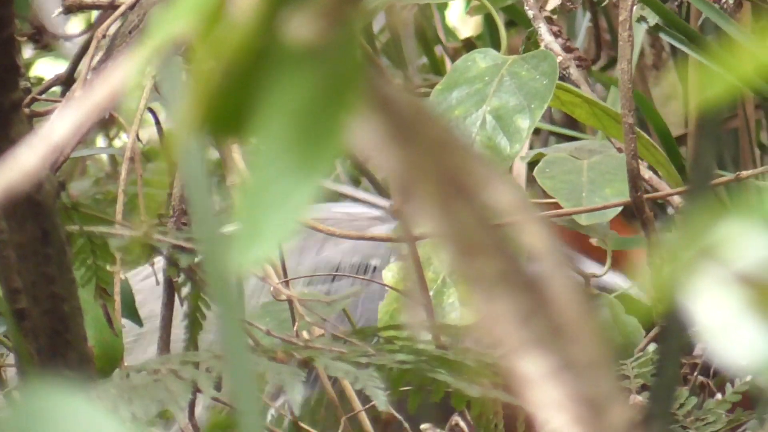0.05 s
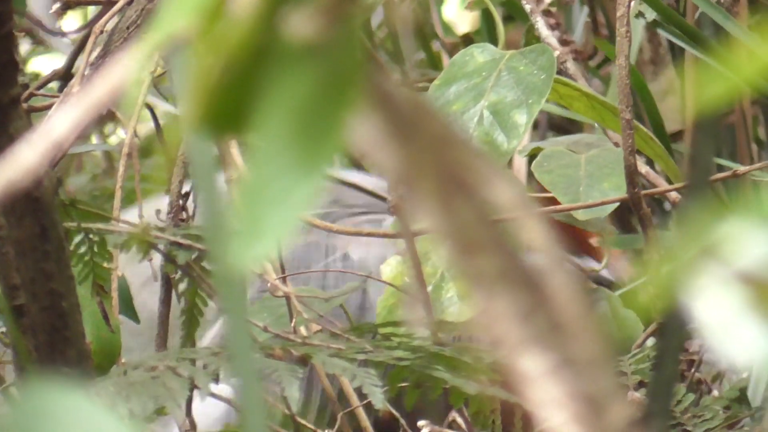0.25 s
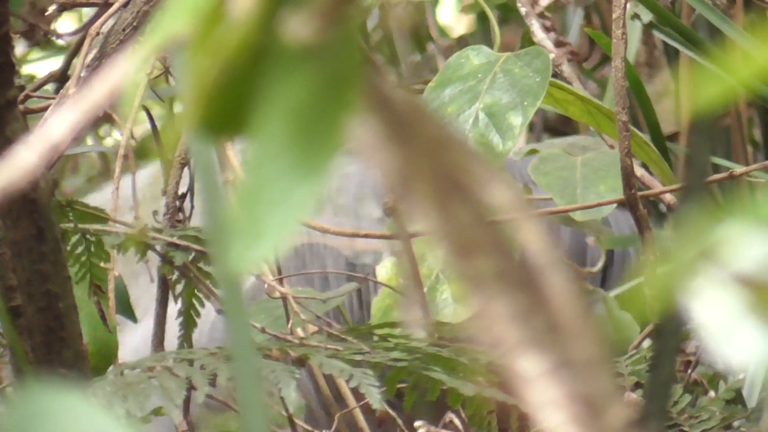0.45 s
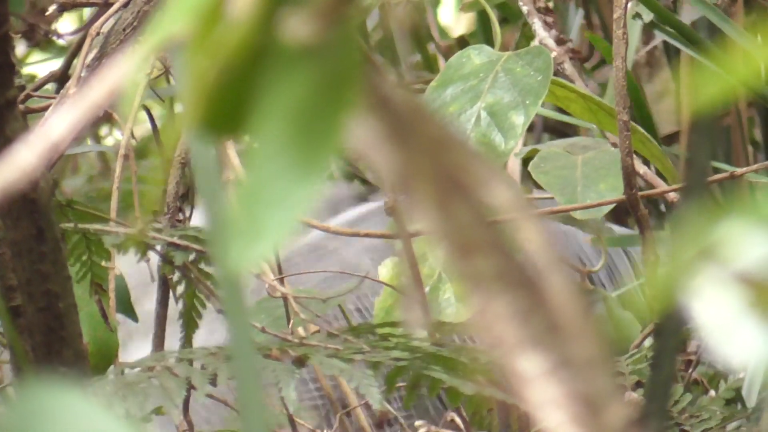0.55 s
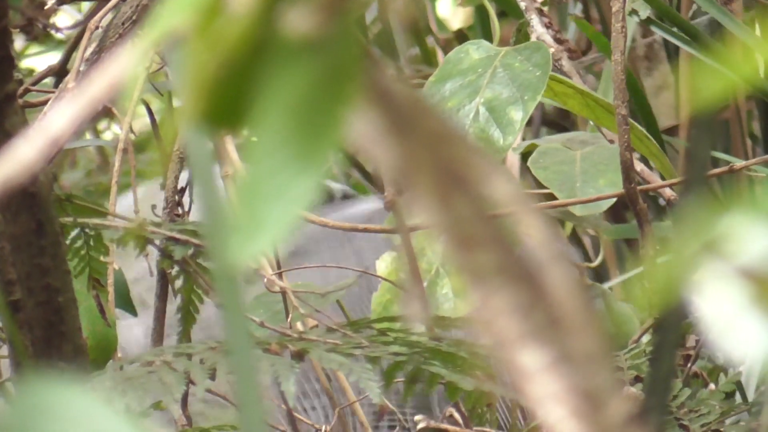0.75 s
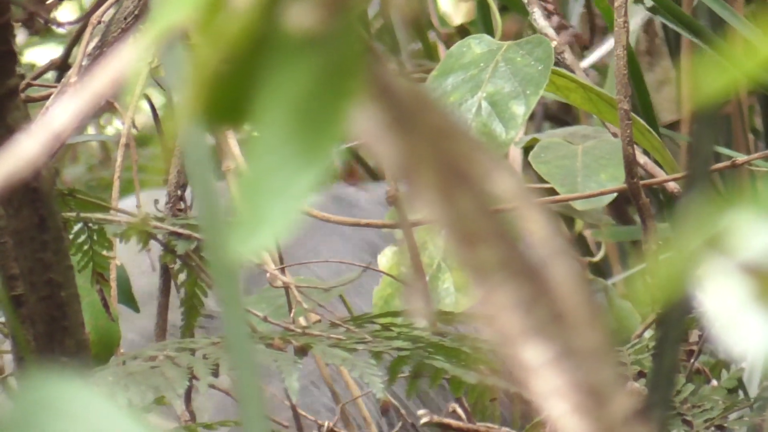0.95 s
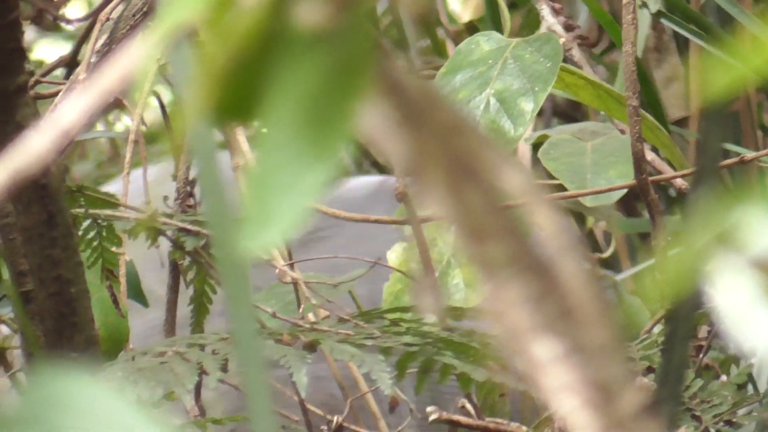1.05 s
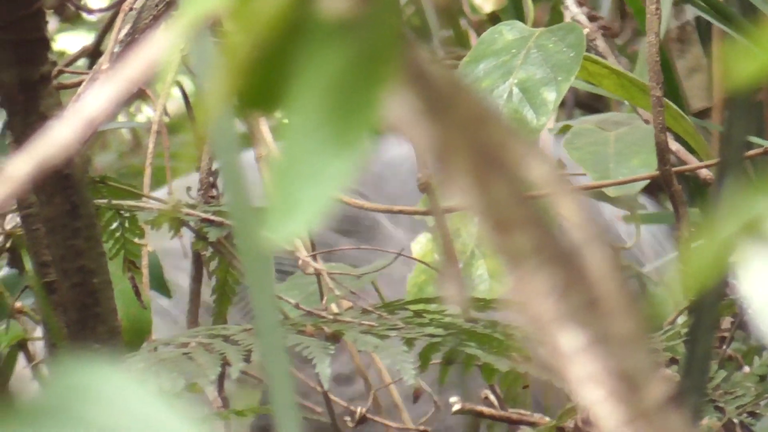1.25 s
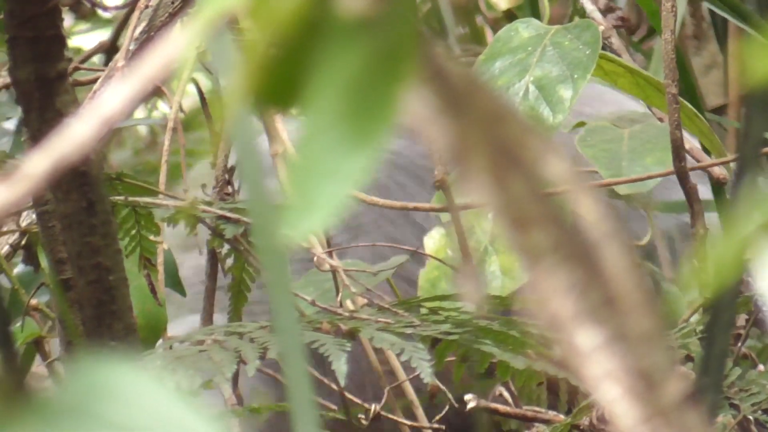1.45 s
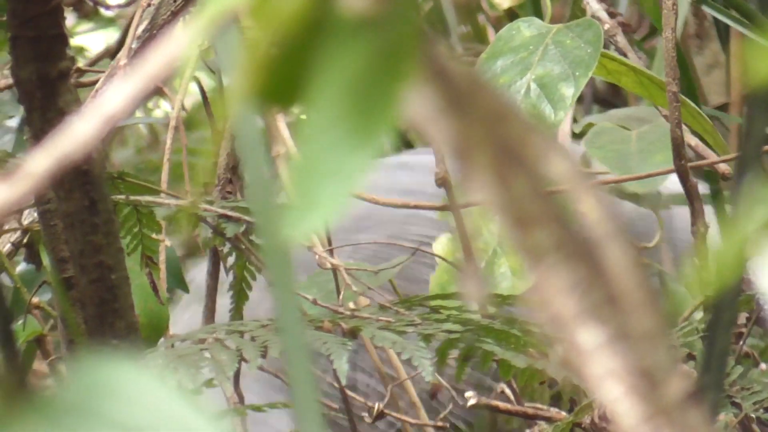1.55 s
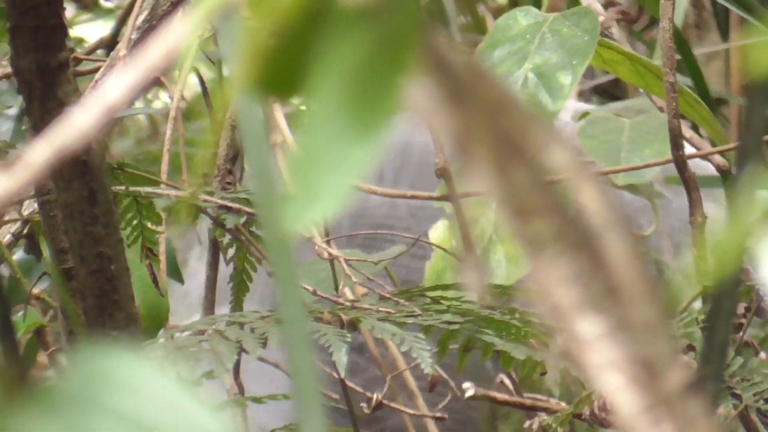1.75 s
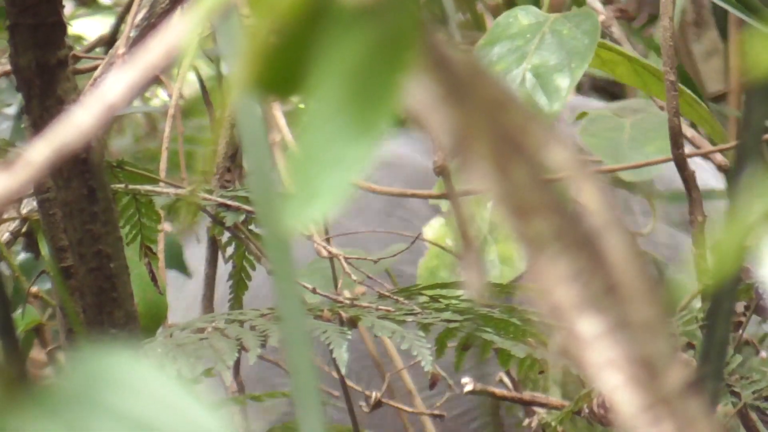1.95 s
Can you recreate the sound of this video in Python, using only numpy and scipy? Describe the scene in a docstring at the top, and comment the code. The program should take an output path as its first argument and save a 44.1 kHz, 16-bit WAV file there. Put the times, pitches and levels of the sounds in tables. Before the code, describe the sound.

A lyrebird in forest undergrowth gives a short rasp, a rising whistle, then a loud falling whip that breaks into a dry rattle and a harsh squeak. Faint distant birds and twig ticks follow over a quiet hiss.

```python
"""A lyrebird sings from the undergrowth over a quiet forest hiss, which swells softly at the start. Its
syrinx snaps out a short rasp, then whistles a two-voiced note that rises and flips up high. A loud
falling whip breaks into a dry rattle, and a harsh arched squeak trails off in a soft growl. Far birds
answer, twigs tick and the hiss swells twice more. Near stems and farther trees scatter the song."""
import sys
import numpy as np
from scipy import signal
from scipy.fft import rfft, irfft
from scipy.io import wavfile
from scipy.ndimage import uniform_filter1d

SR = 44100
rng = np.random.default_rng(int(sys.argv[2]) if len(sys.argv) > 2 else 0)


def file_out(sig):
    """Save sig as 16-bit WAV at sys.argv[1]."""
    # one column per channel
    cols = np.atleast_2d(sig).T
    # limit, then scale
    lim = np.clip(cols, -1, 1)
    pcm = np.round(lim * 32767).astype(np.int16)
    wavfile.write(sys.argv[1], SR, pcm)


N = 88200

# tone of the forest bed, the hiss swells and the twigs (frequency [Hz], relative level [dB])
FOREST_COLOUR = [(25, -14), (173, 1.5), (233, 3), (482, 0), (870, -6), (1410, -4.5), (1800, -13.5),
                 (2060, -11), (2840, -19), (4250, -18.5), (10100, -13.5), (15500, -17)]
SWELL_COLOUR = [(500, 2), (1500, -10), (3000, -4.5), (6000, -8), (9500, 1.5), (15000, -7)]
TICK_COLOUR = [(500, -5), (1500, 4), (3000, -7), (6000, -1)]
# soft swells of hiss (peak time [s], half width [s], level [dB])
SWELLS = [(0.08, 0.18, -53), (1.77, 0.069, -49), (1.947, 0.094, -50.5)]
# twig ticks (time [s], level before the low-pass [dB], cutoff [Hz])
TICKS = [(1.444, -41.5, 5000), (1.485, -57, 4000), (1.662, -44, 2500), (1.684, -38, 3500),
         (1.867, -39.5, 12000), (1.923, -39, 3500)]
# far birds' slurs (start [s], length [s], first pitch [Hz], last pitch [Hz], dry level [dB])
FAR_NOTES = [(1.239, 0.11, 4010, 4420, -54), (1.361, 0.093, 4330, 4384, -51.5),
             (1.393, 0.066, 4600, 5350, -49.5), (1.415, 0.079, 5330, 5080, -56),
             (1.515, 0.048, 4730, 4500, -48), (1.541, 0.029, 4850, 5540, -50.5),
             (1.572, 0.048, 5480, 5370, -50.5), (1.421, 0.19, 2225, 2215, -53.5)]
# pulsed calls: the opening rasp, the buzz in the squeak (time [s], pulse rate [Hz], level [dB])
RASP = [(0, 204, -24), (.013, 166, -35), (.023, 128, -33.5), (.05, 152, -47)]
BUZZ = [(1.098, 653, -44.5), (1.12, 690, -36.5), (1.14, 680, -37), (1.16, 620, -36.5), (1.177, 720, -40),
        (1.21, 640, -45.5)]
# the rattle's two bands (time [s], pulse rate [Hz], body level [dB], treble level [dB])
RATTLE = [(.765, 121.4, -35, -54), (.79, 126, -33.5, -49.5), (.82, 105.4, -34, -41.5),
          (.85, 125, -37.5, -38.5), (.885, 126, -35, -38.5), (.91, 136, -36.5, -40.5),
          (.928, 164, -42, -45.5), (.94, 99, -41.5, -53)]
# breath under the whistles (time [s], level [dB])
BREATH = [(.19, -70), (.225, -63.5), (.3, -64), (.5, -49.5), (.61, -57.5), (.69, -44.5), (.775, -47)]
# throat colours for pulses and breath (frequency [Hz], relative level [dB])
RASP_COLOUR = [(700, -16.5), (1200, -3), (1750, -13), (2200, 1), (2550, 1), (2900, -13), (3900, -12),
               (4600, -25), (5500, -17.5), (7000, -34)]
BUZZ_COLOUR = [(80, -57), (400, -17), (750, 6), (1500, 0), (2200, 10), (3100, 3.5), (4000, 11), (4800, 0),
               (5800, 13), (6600, 0), (7900, -4), (8800, 8), (9600, -7.5), (10500, 3), (13000, -44)]
RATTLE_BODY = [(100, -29), (300, -2.5), (500, 0.5), (1050, 3), (1450, 3.5), (1750, -4), (2080, 0.5),
               (2700, -18), (8000, -65)]
RATTLE_TREBLE = [(3400, -22), (4000, -12), (4800, -14.5), (5450, -4), (5900, -17), (6600, -34), (7300, -14),
                 (8000, -26), (8950, -17.5), (9800, -25), (15000, -34)]
BREATH_COLOUR = [(2800, -27.5), (4300, 16.5), (6300, -8.5), (9000, 7), (11600, 3), (15000, -5.5)]
# whistled notes in order of entry (time [s], pitch [Hz], level [dB])
LOW_VOICE = [(.172, 714, -50.5), (.184, 870, -46.5), (.192, 1225, -33), (.203, 1295, -28.5),
             (.222, 1252, -27), (.243, 1338, -32), (.256, 1477, -33.5), (.266, 1360, -32.5)]
RISING = [(.172, 1334, -45.5), (.192, 2045, -40), (.222, 1916, -40.5), (.25, 1832, -36), (.277, 1793, -33),
          (.318, 1787, -29), (.342, 1845, -22.5), (.355, 1845, -36), (.371, 1884, -24), (.404, 1934, -20.5),
          (.422, 1980, -16), (.44, 2013, -17.5), (.462, 2033, -14.5), (.478, 2037, -13.5),
          (.488, 2148, -13.5), (.494, 2287, -21.5)]
FLIP = [(.493, 2400, -52), (.499, 3540, -41.5), (.505, 4050, -32), (.513, 4800, -46.5), (.524, 5480, -27.5),
        (.543, 5600, -25.5), (.56, 5370, -22), (.57, 5430, -33), (.598, 5540, -41)]
WHIP = [(.627, 2850, -48), (.642, 2593, -31), (.666, 2466, -19.5), (.681, 2266, -14.5), (.695, 2092, -10.5),
        (.709, 2019, -10.5), (.72, 1920, -16), (.731, 1980, -24.5), (.738, 1236, -21.5), (.747, 982, -32.5),
        (.757, 1232, -18.5), (.765, 1420, -26.5), (.772, 1750, -28)]
UNDERTONE = [(1.07, 654, -74), (1.079, 700, -36), (1.086, 784, -35.5), (1.093, 1016, -45),
             (1.099, 1360, -37.5)]
SQUEAK = [(1.094, 3304, -58), (1.099, 4627, -53), (1.105, 5460, -34), (1.115, 5680, -38.5),
          (1.125, 6000, -30), (1.136, 6030, -29), (1.143, 5700, -29), (1.148, 3874, -48),
          (1.153, 3154, -42), (1.161, 2640, -36.5), (1.17, 2080, -37.5)]
GROWL = [(1.155, 800, -52), (1.18, 760, -43), (1.29, 689.8, -46), (1.325, 654, -53.5)]
# overtones the throat lets out (frequency [Hz], level at the note's loudest [dB])
LOW_OVERTONES = [(3800, -56.5), (5000, -75.5), (10200, -66.5), (11300, -53.5)]
RISING_OVERTONES = [(3700, -38), (4200, -59.5), (5500, -44.5), (6300, -77), (7200, -48), (8000, -41.5),
                    (9800, -65.5), (11300, -45.5), (12100, -67), (12900, -54), (14300, -58.5), (15000, -68)]
FLIP_OVERTONES = [(11000, -43)]
WHIP_OVERTONES = [(3200, -44), (4200, -43.5), (5600, -67.5)]
SQUEAK_OVERTONES = [(12000, -41.5), (13000, -56)]
GROWL_OVERTONES = [(1500, -56.5), (3000, -66.5)]

GRAIN_DEPTH, GRAIN_HZ = .36, 220  # overtones flicker in level and phase
OVERTONE_GROWTH = .75  # exponent: overtones swell more slowly than their note
PURE_GLIDE_OCT_PER_S = 16  # faster glides lose their overtones
STEMS_DB, TREES_DB = -15, -16.5  # reverb returns
HARSH_STEMS_DB, HARSH_TREES_DB = 8.5, 9.5  # extra reverb send for the harsh calls


def undb(db):
    """Decibels to gain."""
    return 10 ** (np.asarray(db) / 20)


def unit(x):
    """Scale to rms 1."""
    return x / np.sqrt(np.mean(x ** 2) + 1e-18)


def clock():
    """Time of every sample."""
    return np.arange(N) / SR


def curve(rows, column=1):
    """One column of a table over time, joined by straight lines."""
    rows = np.array(rows)
    return np.interp(clock(), rows[:, 0], rows[:, column])


def envelope(rows, column=2, edge_s=.00095):
    """Gain of a call: its level column, with a quick fade outside each end."""
    outside = np.maximum(0, np.maximum(rows[0][0] - clock(), clock() - rows[-1][0]))
    return undb(curve(rows, column)) * np.exp(-(outside / edge_s) ** 2)


def wander(rate_hz):
    """Smooth random modulation of rms 1."""
    hz = np.arange(N // 2 + 1) * SR / N
    return unit(irfft(rfft(rng.standard_normal(N)) / (1 + (hz / rate_hz) ** 4), N))


def eq_gains(points):
    """Gain at every frequency for a (Hz, dB) shape."""
    hz, db = np.array(points).T
    return undb(np.interp(np.log(np.arange(N // 2 + 1) * SR / N + 1), np.log(hz), db))


def colour(x, points):
    """Minimum-phase EQ with a (Hz, dB) shape; the result has rms 1."""
    cepstrum = irfft(np.log(eq_gains(points)), N)
    cepstrum[1:N // 2] *= 2
    cepstrum[N // 2:] = 0
    impulse = irfft(np.exp(rfft(cepstrum)), N)[:2048]
    return unit(signal.fftconvolve(x, impulse)[:N])


def echoes(x, t60_s, predelay_s, width=.75):
    """Stereo cloud of fading reflections."""
    t = clock()
    mid, side = rng.standard_normal((2, N)) * undb(-60 * t / t60_s) * (t > predelay_s)
    ears = np.array([mid + width * side, mid - width * side])
    return signal.fftconvolve(x[None], unit(ears) / np.sqrt(N), axes=1)[:, :N]


def ground_bounce(x, delay_s=.00186, bounce_db=-10.5):
    """The sound plus its quick reflection off the forest floor."""
    return x + undb(bounce_db) * np.interp(clock() - delay_s, clock(), x, left=0)


def forest_hiss(level_db=-46):
    """A gently flickering noise bed, unrelated left and right."""
    ears = [rng.standard_normal(N) * undb(1.17 * wander(22)) for _ in range(2)]
    return unit(irfft(rfft(ears) * eq_gains(FOREST_COLOUR), N)) * undb(level_db)


def hiss_swells():
    """Soft swells of grainy hiss: one at the start, two near the end."""
    swell = sum(undb(db) * np.exp(-((clock() - at) / half) ** 2) for at, half, db in SWELLS)
    grainy_hiss = rng.standard_normal(N) * undb(1.6 * wander(210))
    return swell * colour(grainy_hiss, SWELL_COLOUR)


def far_birds(flutter=.022, wet_db=1.5):
    """Thin slurred notes with a fast pitch flutter, blurred by the forest."""
    notes = np.zeros(N)
    for start, length, first_hz, last_hz, db in FAR_NOTES:
        along = np.clip((clock() - start) / length, 0, 1)
        hz = (first_hz + (last_hz - first_hz) * along) * (1 + flutter * wander(250.5))
        arch = np.sqrt(np.abs(np.sin(np.pi * along)))
        notes += undb(db) * arch * np.sin(2 * np.pi * np.cumsum(hz) / SR)
    return notes + undb(wet_db) * echoes(notes, t60_s=.74, predelay_s=.045, width=.74)


def twigs(decay_s=.0049):
    """Twigs tick in the litter: tiny noise bursts, some dull, some sharp."""
    t = clock()
    crack = colour(rng.standard_normal(N), TICK_COLOUR)
    ticks = np.zeros(N)
    for at, db, cutoff_hz in TICKS:
        burst = undb(db) * crack * (t > at) * np.exp(-np.abs(t - at) / decay_s)
        ticks += signal.sosfilt(signal.butter(2, cutoff_hz, fs=SR, output="sos"), burst)
    return ticks


def syrinx_pulses(rows, jitter, air_cycles, shimmer_db=1):
    """The syrinx snaps shut once a cycle; a puff of air follows each snap. Gives snaps and puffs."""
    cycles = np.cumsum(curve(rows) * (1 + jitter * wander(100))) / SR
    snaps = np.diff(np.floor(cycles), prepend=0)
    puffs = np.exp(-(cycles % 1) / air_cycles) * rng.standard_normal(N)
    return np.array([unit(snaps - snaps.mean()), unit(puffs)]) * undb(shimmer_db * wander(75))


def syrinx_tone(rows, overtones, waver, rough, flutter_hz):
    """One side of the syrinx: a near sine whose grainy overtones slide through throat resonances."""
    pitch = uniform_filter1d(curve(rows), size=130)
    glide_oct_per_s = np.gradient(np.log2(pitch)) * SR
    steadiness = 1 / (1 + (glide_oct_per_s / PURE_GLIDE_OCT_PER_S) ** 4)
    hz = pitch * (1 + waver * wander(flutter_hz))
    phase = 2 * np.pi * np.cumsum(hz) / SR
    gain = envelope(rows)
    sheen = 0
    for k in range(2, 10):
        partial = np.sin(k * phase + GRAIN_DEPTH * wander(GRAIN_HZ))
        partial *= 1 + GRAIN_DEPTH * wander(GRAIN_HZ)
        throat = undb(np.interp(k * hz, *np.array(overtones).T))
        sheen += throat * partial * (k * hz < SR / 2)
    tone = gain * np.sin(phase) + steadiness * (gain / gain.max()) ** OVERTONE_GROWTH * sheen
    tremble = np.exp(rough * wander(flutter_hz) - rough ** 2)
    return np.sqrt(2) * tone * tremble


def rasp():
    """A short burst of quick snaps with a nasal throat colour."""
    snaps, puffs = syrinx_pulses(RASP, jitter=.061, air_cycles=1)
    return colour(snaps + 1.1 * puffs, RASP_COLOUR) * envelope(RASP)


def rattle():
    """Slower snaps ring the throat and brighten as the call goes on."""
    snaps, puffs = syrinx_pulses(RATTLE, jitter=.018, air_cycles=.78, shimmer_db=1.04)
    body = colour(snaps + .66 * puffs, RATTLE_BODY) * envelope(RATTLE)
    treble = colour(snaps + 1.8 * puffs, RATTLE_TREBLE) * envelope(RATTLE, column=3)
    return body + treble


def squeak():
    """A low voice leads in, buzzes under a high arched note and ends as a growl."""
    snaps, puffs = syrinx_pulses(BUZZ, jitter=.016, air_cycles=.79)
    buzz = colour(snaps + 1.1 * puffs, BUZZ_COLOUR) * envelope(BUZZ)
    arch = syrinx_tone(SQUEAK, SQUEAK_OVERTONES, waver=.0092, rough=.1, flutter_hz=412)
    lead_in = syrinx_tone(UNDERTONE, GROWL_OVERTONES, waver=.0234, rough=.13, flutter_hz=306)
    growl = syrinx_tone(GROWL, GROWL_OVERTONES, waver=.19, rough=.31, flutter_hz=304.6)
    return buzz + arch + lead_in + growl


def whistles():
    """Two voices start together; the upper rises, flips high and whips down, over a trace of breath."""
    turbulence = rng.standard_normal(N) * undb(2.3 * wander(340))
    breath = colour(turbulence, BREATH_COLOUR) * envelope(BREATH, column=1)
    low = syrinx_tone(LOW_VOICE, LOW_OVERTONES, waver=.013, rough=.27, flutter_hz=650)
    rising = syrinx_tone(RISING, RISING_OVERTONES, waver=.003, rough=.05, flutter_hz=160)
    flip = syrinx_tone(FLIP, FLIP_OVERTONES, waver=.004, rough=.1, flutter_hz=300)
    whip = syrinx_tone(WHIP, WHIP_OVERTONES, waver=.0067, rough=.023, flutter_hz=155)
    return breath + low + rising + flip + whip


def scene():
    """The bird among stems and trees, over the forest bed; harsh calls scatter more than whistles."""
    clear = whistles()
    harsh = rasp() + ground_bounce(rattle()) + squeak()
    stems = echoes(clear + undb(HARSH_STEMS_DB) * harsh, t60_s=.06, predelay_s=.003)
    trees = echoes(clear + undb(HARSH_TREES_DB) * harsh, t60_s=.42, predelay_s=.01)
    lyrebird = clear + harsh + undb(STEMS_DB) * stems + undb(TREES_DB) * trees
    return lyrebird + far_birds() + twigs() + hiss_swells() + forest_hiss()


def record(dry):
    """A gentle low cut thins the deep bass; a steep high cut trims the top."""
    low_cut_hz, high_cut_hz = 47, 15700
    thinned = signal.sosfilt(signal.butter(2, low_cut_hz, "highpass", fs=SR, output="sos"), dry)
    return signal.sosfilt(signal.ellip(10, .1, 80, high_cut_hz, fs=SR, output="sos"), thinned)


dry = scene()
out = record(dry)
file_out(out)
```